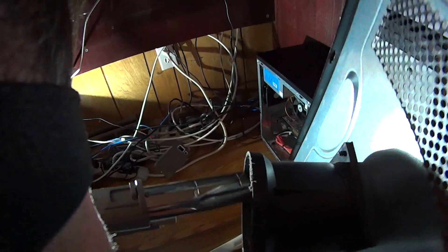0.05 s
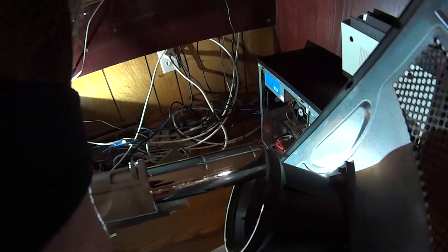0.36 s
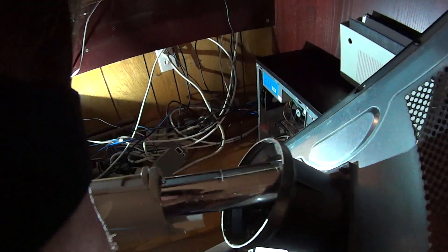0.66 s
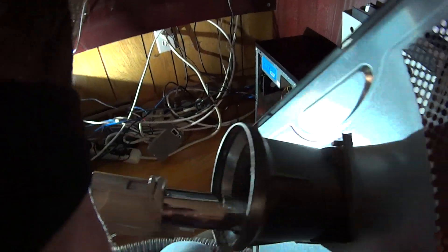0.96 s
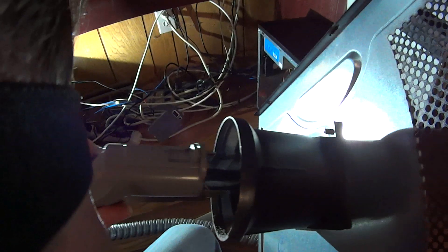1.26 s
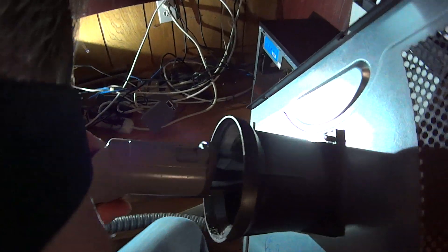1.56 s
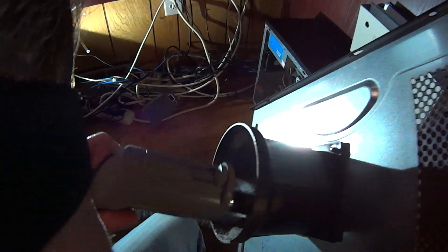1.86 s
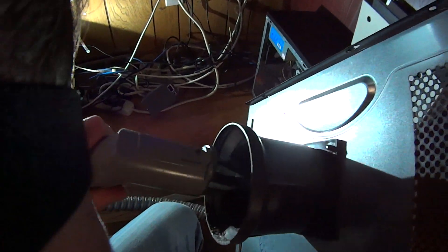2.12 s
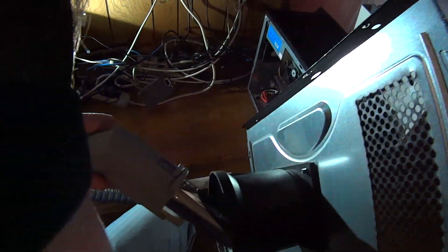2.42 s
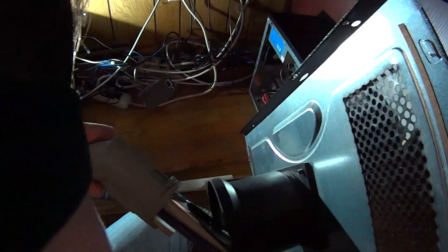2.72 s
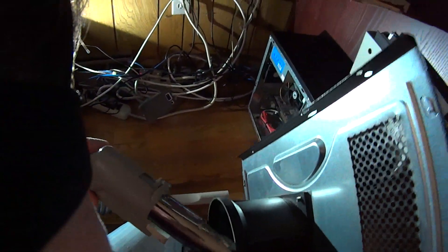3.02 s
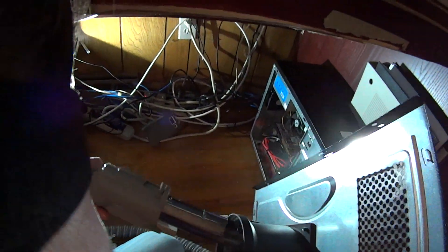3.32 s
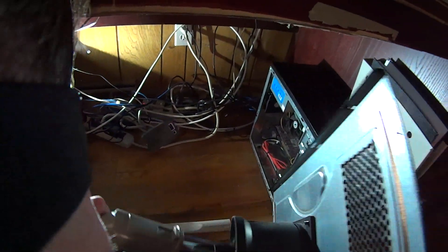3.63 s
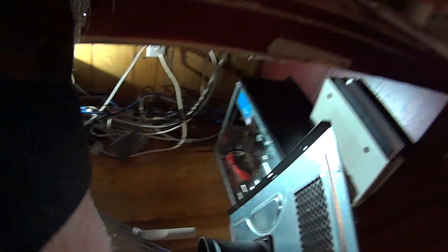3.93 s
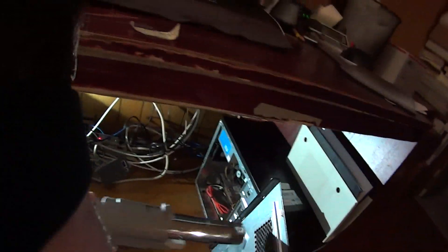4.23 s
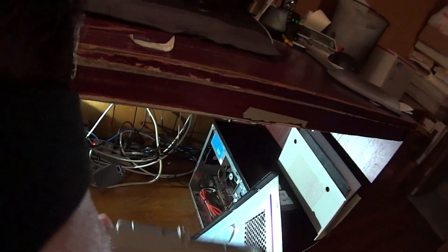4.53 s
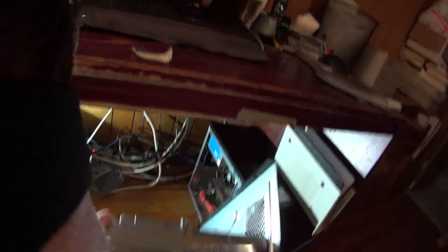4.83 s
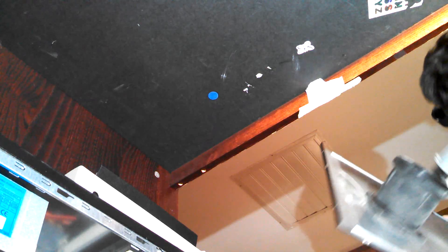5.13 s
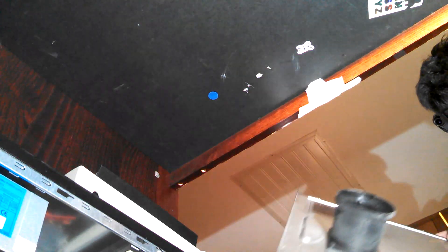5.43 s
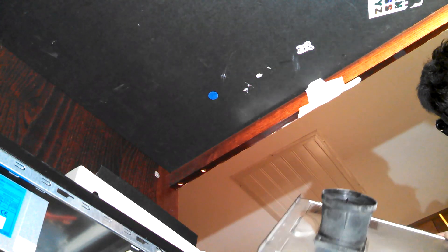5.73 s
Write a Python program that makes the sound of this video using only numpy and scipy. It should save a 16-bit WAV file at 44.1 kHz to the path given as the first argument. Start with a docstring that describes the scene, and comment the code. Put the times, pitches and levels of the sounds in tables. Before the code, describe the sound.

Close, hissing suction pours into a vacuum cleaner's metal wand as it moves over a computer case in a small room. The rush turns hollow inside a plastic duct, where the wand makes a few dull bumps, then opens out again with airy whistles and brief puffs as it grazes the panel. The motor hums steadily in pitch under a broad exhaust roar, wavering in loudness and never stopping.

```python
"""Vacuum cleaner on a computer case.

In a small room, a metal wand is worked over the side panel and air duct. Air rushes into the
wand, whistles breathily at edges and sets the tube ringing hollowly. Now and then the wand
bumps the duct. Behind it, the motor hums under the roar of its exhaust; both dip and swell."""
import sys
import numpy as np
from scipy import signal
from scipy.fft import rfft, irfft, next_fast_len
from scipy.io import wavfile
from scipy.ndimage import uniform_filter1d, map_coordinates

SR = 44100
rng = np.random.default_rng(int(sys.argv[2]) if len(sys.argv) > 2 else 0)


def wav_record(signal):
    """Record a signal, one row per channel, as 16-bit PCM in the file named by sys.argv[1]."""
    frames = np.transpose(np.atleast_2d(signal))
    bounded = np.clip(frames, -1, 1)
    # unit amplitude maps onto the largest positive 16-bit level
    quanta = np.round(bounded * 32767).astype(np.int16)
    wavfile.write(sys.argv[1], SR, quanta)


N = 263277

# hollow noise in the tube: time_s, level_db
TUBE_DB = [(0.0, -32), (0.38, -40), (0.45, -32), (1.05, -25.5), (2.26, -26.5), (2.33, -23.5), (2.59, -30),
           (2.66, -28), (2.73, -35), (3.14, -32), (5.09, -27.5), (5.15, -29.5), (5.39, -27), (5.97, -26.5)]
# rush at the mouth: time_s, level_db
RUSH_DB = [(0.0, -31), (0.38, -25.5), (0.45, -27.5), (0.8, -23.5), (1.2, -28.5), (1.43, -27), (1.93, -28),
           (1.99, -24), (3.08, -24), (3.52, -31), (3.91, -23), (4.31, -34), (4.46, -25), (5.37, -22.5),
           (5.59, -27), (5.97, -24)]
# enclosure of the mouth by the duct: time_s, share (0-1)
ENCLOSURE = [(0, 0.47), (.52, 0.5), (.62, 0.37), (.88, 0.56), (.98, 0.97), (2.3, 0.92), (2.6, 0),
             (3.2, 0.47), (3.5, 0.1), (3.8, 0.34), (4.3, 0.3), (4.5, 0.29)]
# tube noise, mouth in the duct: freq_hz, density_db
TUBE_IN_DUCT = [(700, -32), (1300, -2), (1900, -2.5), (2400, 2.5), (2900, -4), (3400, -4.5), (4100, -12.5),
                (7000, -15.5)]
# tube noise, mouth in the open: freq_hz, density_db
TUBE_IN_OPEN = [(400, -24.5), (900, -7), (1400, 0), (2000, -2), (2700, -2), (3500, -7), (6000, -12)]
# rush, mouth in the duct: freq_hz, density_db
RUSH_IN_DUCT = [(2000, -28.5), (3500, -6.5), (4400, -12), (5400, 0), (6500, 2), (7800, -3), (9000, -4),
                (11500, -19)]
# rush, mouth in the open: freq_hz, density_db
RUSH_IN_OPEN = [(2000, -24), (3300, 0.5), (4200, 4.5), (5200, 2.5), (6500, -1.5), (7800, -4), (9500, -13),
                (11500, -37)]
# hiss at the rim: freq_hz, density_db
RIM_SPECTRUM = [(3500, -29), (6000, -4.5), (7500, 0), (8700, 1), (10000, 3.5), (11200, -1)]
# rim muffled: start_s, end_s, loss_db
RIM_MUFFLES = [(0.907, 1.2, 13), (1.694, 1.767, 3), (3.36, 3.586, 10), (4.046, 4.423, 10.5)]
# mouth catching on the panel: middle_s, length_s, loss_db
DRAUGHT_CHOKES = [(.22, .06, 5), (0.49, 0.083, 9), (1.97, 0.023, 2), (2.745, 0.054, 6), (3.74, 0.044, 6),
                  (4.475, 0.033, 7), (4.82, 0.051, 5.5), (5.14, 0.037, 3)]
# edge whistles and long tube ringing: start_s, length_s, first_hz, last_hz, width_hz, level_db
WHISTLES_AND_RINGS = [(0.018, 0.41, 1096, 1157, 372, -29), (0.021, .14, 9000, 8330, 1700, -18.5),
                      (0.16, 0.1, 8560, 9520, 1400, -18), (0.38, 0.051, 8700, 8500, 600, -24),
                      (0.442, 0.06, 9800, 8950, 650, -18.5), (0.504, 0.062, 8700, 8550, 650, -17.5),
                      (0.658, 0.26, 6120, 5730, 1000, -25), (0.723, 0.15, 8940, 8900, 1300, -25.5),
                      (.93, 1.05, 1390, 1410, 130, -35.5), (1.19, 0.67, 3260, 3414, 700, -33),
                      (1.289, 0.45, 6430, 6530, 2000, -29), (2.191, 0.41, 8480, 7360, 1300, -26.5),
                      (2.252, 0.97, 2816, 2804, 330, -30), (2.422, 0.77, 1169, 1208, 250, -34),
                      (2.705, 0.12, 8860, 9000, 1300, -22), (2.889, 0.23, 8100, 8150, 1700, -22),
                      (3.239, 0.79, 2810, 2980, 222, -34), (3.38, 0.68, 1207, 1259, 400, -28.5),
                      (3.999, 0.82, 1350, 1350, 320, -33.5), (5.082, 0.3, 6910, 5890, 1293, -27.5),
                      (5.35, 0.67, 1894, 2255, 900, -30.5)]
# mouth grazing the panel: middle_s, length_s, centre_hz, width_hz, level_db
GRAZE_PUFFS = [(.335, .08, 2500, 900, -31.5), (.36, .05, 1250, 500, -29), (1.665, .04, 6510, 2500, -28),
               (1.72, .055, 1420, 300, -26), (1.809, 0.033, 9600, 1200, -20),
               (1.901, 0.048, 1350, 400, -24), (2.35, .1, 2245, 600, -27),
               (2.648, 0.045, 3400, 2600, -21.5), (3.101, 0.07, 2720, 550, -24.5),
               (3.132, .05, 4310, 1600, -22.5), (3.32, 0.053, 10040, 3000, -27),
               (3.7, 0.18, 9680, 2600, -23.5), (3.917, 0.041, 6560, 3990, -22),
               (4.457, 0.044, 9500, 3500, -22), (4.7, 0.094, 3195, 1400, -24),
               (4.886, .07, 2903, 1800, -25), (5.021, 0.054, 3000, 1800, -24),
               (5.401, .13, 2996, 1400, -25.5)]
# wand against the duct: start_s, level_db, ring_hz, t60_s
DUCT_BUMPS = [(1.414, -29, 149, 0.22), (1.482, -37, 151, 0.078), (1.748, -18.5, 589, 0.2),
              (1.748, -18, 3320, 0.02), (1.855, -25.5, 137, 0.16), (1.922, -34, 120, 0.083),
              (2.319, -28.5, 171, 0.17), (2.325, -23, 520, 0.2), (4.44, -42, 80, 0.41),
              (5.57, -41.5, 101.5, 0.19), (5.87, -44, 84.6, 0.66)]
# motor hum, dipping and swelling: time_s, level_db
HUM_DB = [(0.0, -27.5), (0.18, -29), (0.37, -23), (0.48, -32), (0.6, -28), (0.8, -32), (0.93, -22.5),
          (2.36, -25), (2.56, -29), (2.66, -28), (2.76, -48), (2.86, -36), (3.08, -40.5), (3.19, -27.5),
          (3.56, -27.5), (3.82, -33.5), (4.09, -25), (4.41, -24.5), (4.47, -32.5), (4.59, -24.5),
          (4.75, -31.5), (5.05, -29), (5.12, -37), (5.5, -39), (5.55, -33), (5.97, -30)]
# exhaust roar: freq_hz, density_db
EXHAUST_SPECTRUM = [(25, -60), (45, -20), (110, -16), (150, -8), (180, -8), (270, -3.5), (350, -1),
                    (500, -1.5), (850, 0), (1100, 1), (1500, 0), (1700, -5), (3000, -8.5), (5000, -23.5)]
# motor shaft speed: time_s, rate_hz
SHAFT_HZ = [(0, 305.9), (2.64, 306.4), (2.84, 308.3), (3.25, 311.8), (3.6, 307.9), (4.5, 307), (5.0, 310.7),
            (5.42, 315.3), (5.97, 311)]
# shaft harmonics relative to the hum: order, level_db
SHAFT_HARMONICS = [(1, 0), (2, -18.5), (4, -39), (5, -11.5)]
# fan whine: time_s, level_db
WHINE_DB = [(0, -45), (2.9, -52), (3.3, -41), (4.0, -37.5), (4.4, -45), (4.65, -37.5), (5.05, -36.5),
            (5.25, -45), (5.97, -44)]
# standing waves of housing and wand: centre_hz, width_hz, boost_db
STANDING_WAVES = [(219.7, 20, 8.5), (508, 19.5, 6), (1400, 160, 3), (2880, 350, 7), (4330, 160, 6.5),
                  (5760, 200, 1), (7080, 300, 5)]
# left-right likeness in the room: freq_hz, correlation
ROOM_COHERENCE = [(50, 0.71), (500, 1), (2000, 0.89), (11000, 0.87)]
# phase of left ahead of right: freq_hz, lead_rad
LEFT_LEAD = [(40, 0.64), (170, 0.4), (300, 0.94), (900, 0.97), (1400, 0.68), (2000, 0.39), (2800, 0.17),
             (4300, 0.53), (9000, 0)]

FADE_S = 0.04  # shortest fade of an air band


def wand(rim_db=-18, rim_follow=0.091, usual_rush_db=-23, duct_loss_db=4):
    """Air drawn into the wand: hollow tube noise, a rush at the mouth, a hiss at the rim."""
    tube_db, rush_db, enclosed = curve(TUBE_DB), curve(RUSH_DB), np.clip(curve(ENCLOSURE), 0, 1)
    muffle_db, choke_db = muffling_db(), choking_db()
    inside, outside = np.sqrt(enclosed), np.sqrt(1 - enclosed)
    # standing waves colour this noise only inside the duct
    tube = inside * amp(2.5) * turbulence(TUBE_IN_DUCT, patchy_db=2.5, ringing=0.64)
    tube += outside * amp(2) * turbulence(TUBE_IN_OPEN, patchy_db=3, ringing=0)
    rush = inside * amp(2.5) * turbulence(RUSH_IN_DUCT, patchy_db=3, ringing=1)
    rush += outside * turbulence(RUSH_IN_OPEN, patchy_db=3.4, ringing=0)
    hiss = turbulence(RIM_SPECTRUM, patchy_db=2.05, ringing=0)
    hiss_db = rim_db + rim_follow * (rush_db - usual_rush_db) - duct_loss_db * enclosed - muffle_db
    air = amp(tube_db - choke_db + 0.61 * wobble(22)) * tube
    air += amp(rush_db - 0.57 * choke_db - 0.067 * muffle_db + 1.1 * wobble(35)) * rush
    air += amp(hiss_db + 1.3 * wobble(30)) * hiss
    return air * amp(0.46 * wobble(30))


def muffling_db(ramp_s=0.069):
    """Hiss lost while the rim is muffled."""
    t = np.arange(N) / SR
    return sum(loss_db * np.clip(0.5 + np.minimum(t - start_s, end_s - t) / ramp_s, 0, 1)
               for start_s, end_s, loss_db in RIM_MUFFLES)


def choking_db():
    """Draught lost as the mouth briefly catches on the panel."""
    t = np.arange(N) / SR
    return sum(loss_db * np.exp(-2 * ((t - middle_s) / length_s) ** 2)
               for middle_s, length_s, loss_db in DRAUGHT_CHOKES)


def whistles_and_rings():
    """Breathy whistles at edges, long hollow ringing of the wand's tube, a puff at each graze."""
    out = np.zeros((2, N))
    for start_s, length_s, first_hz, last_hz, width_hz, level_db in WHISTLES_AND_RINGS:
        glide_hz = np.linspace(first_hz, last_hz, int((length_s + FADE_S) * SR))
        add(out, start_s - FADE_S / 2, air_band(glide_hz, width_hz, level_db))
    for middle_s, length_s, centre_hz, width_hz, level_db in GRAZE_PUFFS:
        steady_hz = np.full(int((length_s + FADE_S) * SR), centre_hz)
        add(out, middle_s - (length_s + FADE_S) / 2, air_band(steady_hz, width_hz, level_db))
    return out


def air_band(centre_hz, width_hz, level_db, waver=0.014):
    """A breathy band swells, holds and fades; hand tremor shakes its pitch."""
    t = np.arange(len(centre_hz)) / SR
    ramp = np.clip(np.minimum(t, t[-1] - t) / max(FADE_S, t[-1] / 5), 0, 1)
    swell = np.sin(np.pi / 2 * ramp)
    tremor = 1 + waver * wobble(24.95, len(t))
    return amp(level_db) * swell * resonance(centre_hz * tremor, width_hz)


def bumps(width_ratio=0.51, attack_s=0.0008):
    """The wand knocks the plastic duct: the wall flexes in and back and rings, heavily damped."""
    out, t = np.zeros((2, N)), np.arange(SR // 4) / SR
    for start_s, level_db, ring_hz, t60_s in DUCT_BUMPS:
        flex_rad = np.pi * ring_hz * t
        flex = flex_rad * (1 - flex_rad / 2) * np.exp(1 - flex_rad)
        envelope = amp(-60 * t / t60_s) * (1 - np.exp(-t / attack_s))
        ring = envelope * resonance(np.full(len(t), ring_hz), width_ratio * ring_hz)
        add(out, start_s, amp(level_db) * (flex + ring))
    return out


def exhaust(usual_roar_db=-26, usual_hum_db=-27.5, follow=0.69, flutter_db=0.5):
    """Broad roar coloured by the housing; follows the hum's level less deeply, dips at each choke."""
    roar_db = usual_roar_db + follow * (curve(HUM_DB) - usual_hum_db) - 0.34 * choking_db()
    gain = amp(roar_db + flutter_db * wobble(24))
    return gain * turbulence(EXHAUST_SPECTRUM, patchy_db=1.13, ringing=1)


def motor(trim_db=0.35, flutter_db=1.25, overtone_flutter_db=3.5, drift_hz=0.18, whine_order=6):
    """The unbalanced rotor hums once a turn; overtones and fan whine flutter in the moving air."""
    shaft_rad = 2 * np.pi * np.cumsum(curve(SHAFT_HZ) + drift_hz * wobble(14)) / SR
    hum_db = curve(HUM_DB) + flutter_db * wobble(24.26)
    whine_db = curve(WHINE_DB) + overtone_flutter_db * wobble(12)
    out = amp(whine_db) * np.sin(whine_order * shaft_rad)
    for order, level_db in SHAFT_HARMONICS:
        flicker_db = (order > 1) * overtone_flutter_db * wobble(12)
        out += amp(hum_db + level_db + flicker_db) * np.sin(order * shaft_rad)
    return np.sqrt(2) * amp(trim_db) * out


def turbulence(spectrum, patchy_db, ringing):
    """Stereo noise, rms 1; eddies lift and lower patches of it; ringing scales the standing waves."""
    hz, _, bins = signal.stft(rng.standard_normal((2, N)), SR, nperseg=2048)
    eddies = uniform_filter1d(rng.standard_normal(bins.shape[1:]), size=16, axis=0)
    eddies = uniform_filter1d(eddies, size=5, axis=1)
    waves_db = sum(boost_db / (1 + (2 * (hz - centre_hz) / width_hz) ** 2)
                   for centre_hz, width_hz, boost_db in STANDING_WAVES)
    colour_db = at_hz(spectrum, hz) + ringing * waves_db
    bins = spread(bins, hz[:, None]) * amp(colour_db[:, None] + patchy_db * unit_rms(eddies))
    return unit_rms(signal.istft(bins, nperseg=2048)[1][:, :N])


def resonance(centre_hz, width_hz):
    """Stereo noise band, rms 1, with a per-sample centre."""
    white = rng.standard_normal((2, 2, len(centre_hz)))
    baseband = filtered(white, lambda hz: 1 / (1 + (hz / (0.95 * width_hz)) ** 2) ** 2.38)
    phase = 2 * np.pi * np.cumsum(centre_hz) / SR
    band = baseband[0] * np.cos(phase) + baseband[1] * np.sin(phase)
    return unit_rms(spread(band, centre_hz.mean()))


def spread(pair, hz):
    """Two independent signals to left and right, at the room's coherence."""
    angle = np.arccos(np.clip(at_hz(ROOM_COHERENCE, hz), -1, 1)) / 2
    mid, side = np.cos(angle) * pair[0], np.sin(angle) * pair[1]
    return np.array([mid + side, mid - side])


def amp(db):
    """Decibels to gain."""
    return 10 ** (np.asarray(db) / 20)


def unit_rms(x):
    """Scale to rms 1."""
    return x / np.sqrt(np.mean(np.abs(x) ** 2) + 1e-20)


def at_hz(table, hz):
    """Interpolate on a log frequency axis."""
    freq_hz, values = np.transpose(table)
    return np.interp(np.log(hz + 1), np.log(freq_hz + 1), values)


def curve(table):
    """Interpolate in time, one value per sample."""
    time_s, values = np.transpose(table)
    return np.interp(np.arange(N) / SR, time_s, values)


def wobble(rate_hz, size=N):
    """Smooth random curve with knots at rate_hz."""
    knots = rng.standard_normal(int(size * rate_hz / SR) + 4)
    return map_coordinates(knots, [np.arange(size) * rate_hz / SR])


def filtered(x, response):
    """Apply response(hz) by padded FFT."""
    size = x.shape[-1]
    padded = next_fast_len(size + 8192)
    return irfft(rfft(x, padded) * response(np.fft.rfftfreq(padded, 1 / SR)), padded)[..., :size]


def add(track, start_s, sound):
    """Mix a stereo sound into the track."""
    span = track[:, max(round(start_s * SR), 0):][:, :sound.shape[1]]
    span += sound[:, :span.shape[1]]


def scene():
    """Machine and bumps slightly right; the wand's air nearly straight ahead."""
    right = motor() + exhaust() + bumps()
    ahead = wand() + whistles_and_rings()
    return right * amp([[-0.8], [0.8]]) + ahead * amp([[-0.2], [0.2]])


def record(dry, top_hz=11130):
    """Left leads right in phase, most in the bass and mids; nothing passes above top_hz."""
    def response(hz):
        phase_rad = 0.5 * np.outer([1, -1], at_hz(LEFT_LEAD, hz))
        return np.exp(1j * phase_rad) * (hz < top_hz)
    return filtered(dry, response)


dry = scene()
out = record(dry)
wav_record(out)
```